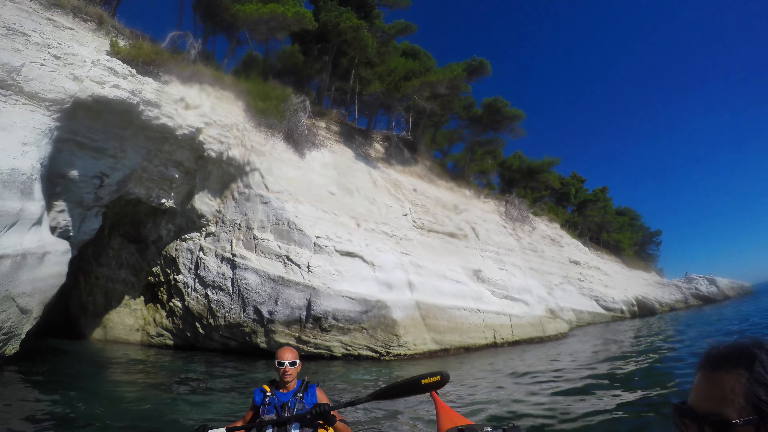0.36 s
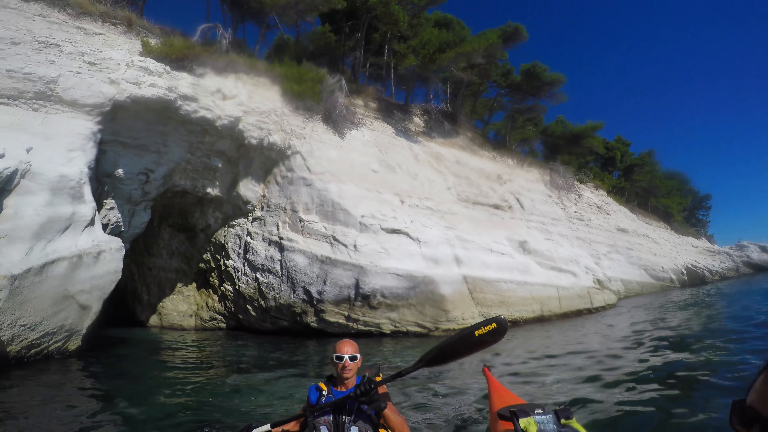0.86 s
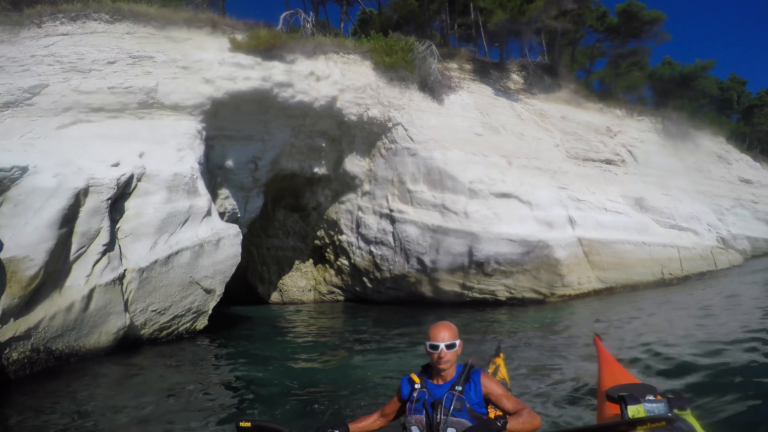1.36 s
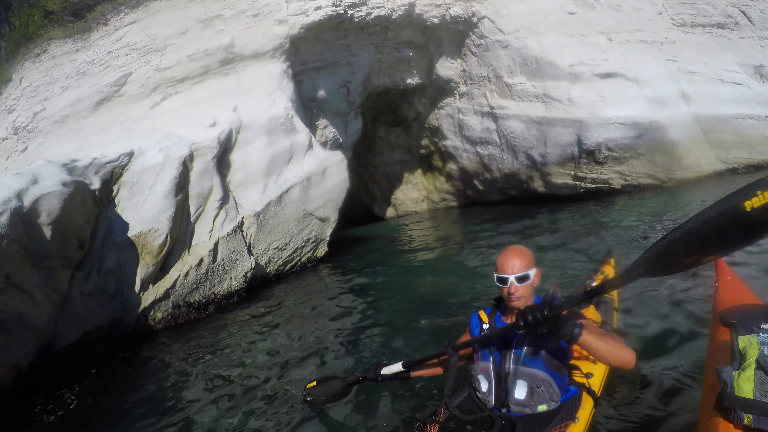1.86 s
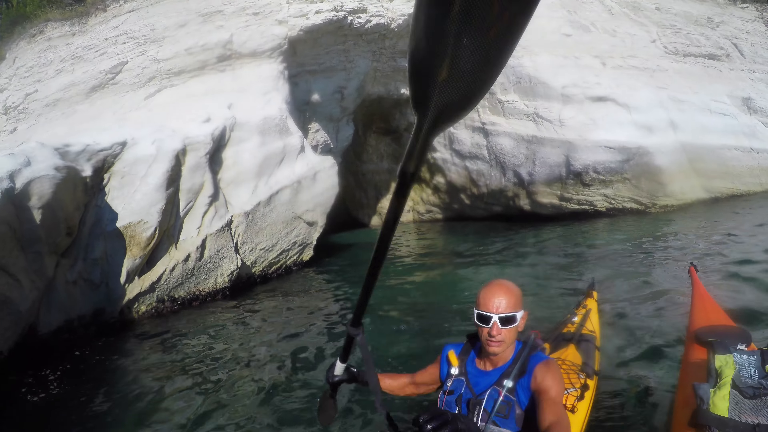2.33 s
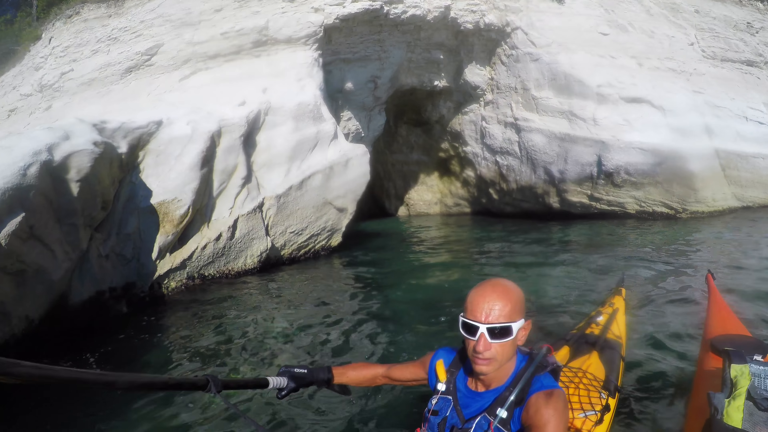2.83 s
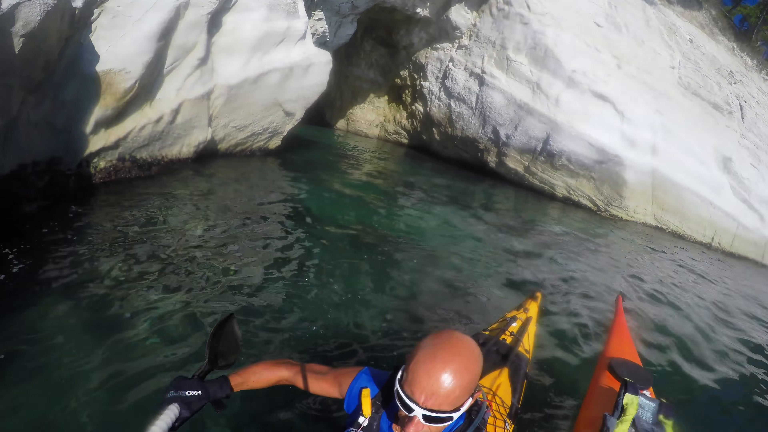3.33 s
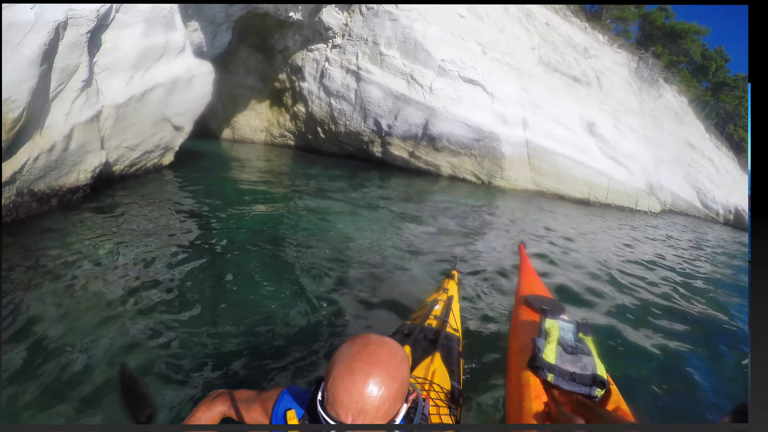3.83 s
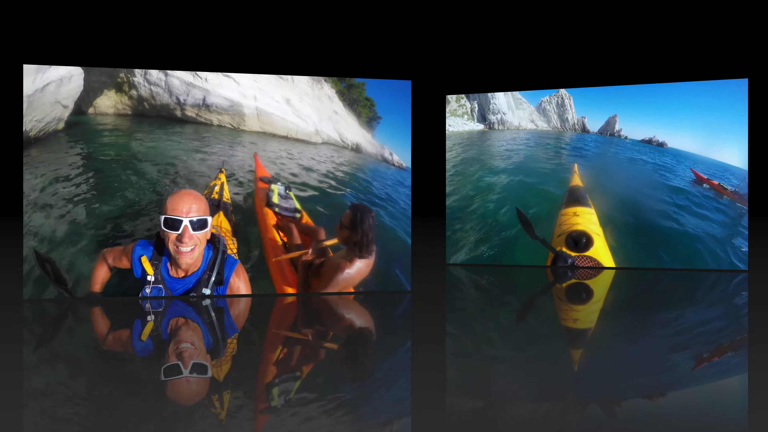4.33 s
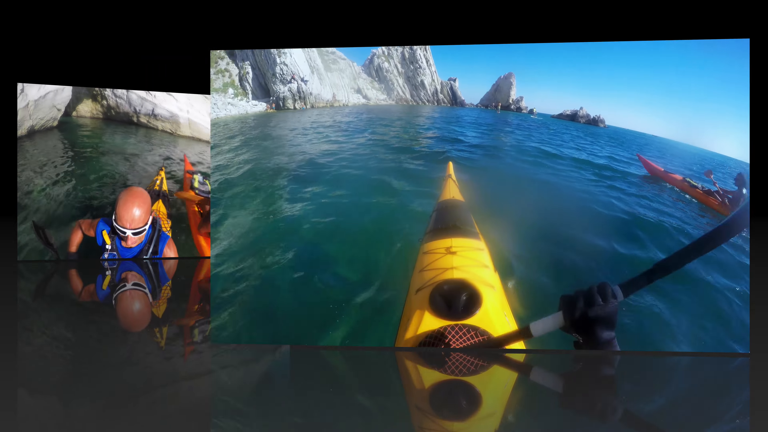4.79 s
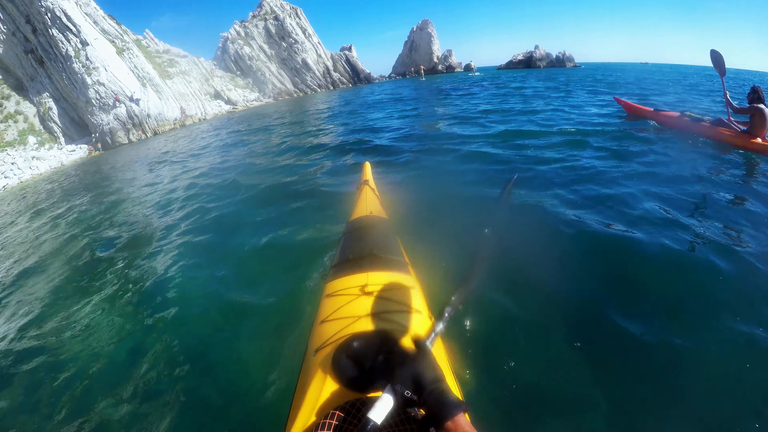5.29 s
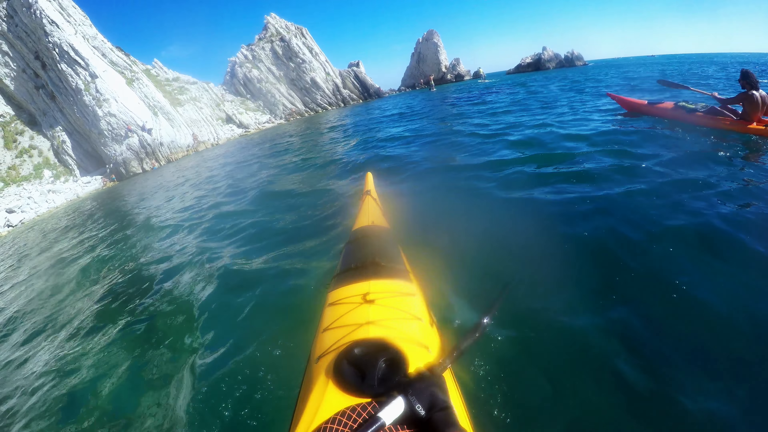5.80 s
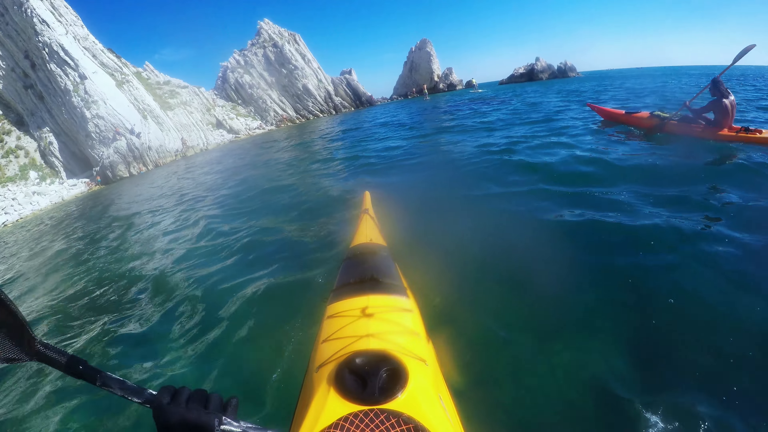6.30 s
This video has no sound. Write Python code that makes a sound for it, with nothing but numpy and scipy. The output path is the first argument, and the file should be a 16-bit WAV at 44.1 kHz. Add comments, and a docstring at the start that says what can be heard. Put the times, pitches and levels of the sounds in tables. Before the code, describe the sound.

Loud hollow knocks and thumps on a sealed case over low hull rumble and soft sea hiss, with rubbing fingers and faint bubbles.

```python
"""Kayak heard from inside a sealed case

Blows on the case ring its modes and thump its mount; rubbing fingers and cloth make bursts of noise grains.
Filtered-noise hull rumble and sea hiss lie beneath, with a pulsing cicada band, bubble drips of rising pitch
and a faint narrow tone. A cliff scene cross-fades to open water; the loudest knocks clip."""
import sys
import numpy as np
from scipy import signal
from scipy.fft import rfft, irfft, next_fast_len
from scipy.io import wavfile
from scipy.ndimage import uniform_filter1d, map_coordinates

SR = 44100
rng = np.random.default_rng(int(sys.argv[2]) if len(sys.argv) > 2 else 0)


def digitize_waveform(pressure):
    """Quantize a signal to 16-bit integers and store it at the path in sys.argv[1].

    Rows of a 2-D input are taken as channels; values are limited to [-1, 1].
    """
    field = np.atleast_2d(pressure).T
    bounded = np.clip(field, -1, 1)
    quanta = np.round(bounded * 32767).astype(np.int16)
    wavfile.write(sys.argv[1], SR, quanta)


def ratio(d):
    """dB to gain"""
    e = np.asarray(d, float) / 20
    return 10 ** e


N = 282573
TIME = np.arange(N) / SR


def unit(x):
    """Scales a signal to rms 1."""
    return x / np.sqrt(np.mean(x ** 2) + 1e-20)


def curve(rows):
    """Draws straight lines between (time_s, value) points, one value per sample."""
    time_s, value = np.transpose(rows)
    return np.interp(TIME, time_s, value)


def wobble(rate):
    """A smooth random curve with rate knots a second."""
    return map_coordinates(rng.standard_normal(int(N * rate / SR) + 4), [TIME * rate])


def filtered(x, response):
    """Multiplies the spectrum of x by a complex response of frequency."""
    m = next_fast_len(len(x) + 8192)
    return irfft(rfft(x, m) * response(np.fft.rfftfreq(m, 1 / SR)), m)[:len(x)]


def coloured(x, spectrum):
    """Shapes x by relative (frequency_hz, level_db) points on a log pitch axis, then scales to rms 1."""
    f, db = np.transpose(spectrum)
    return unit(filtered(x, lambda hz: ratio(np.interp(np.log(hz + 1), np.log(f + 1), db))))


def add(track, start_s, sound):
    """Mixes a sound into a track, cut off at the track's end."""
    part = track[round(start_s * SR):][:len(sound)]
    part += sound[:len(part)]


def open_share():
    """Share of the open-water scene, rising from 0 to 1 over the cross-fade."""
    return np.interp(TIME, [4, 5.05], [0, 1])


def both_scenes(source, cliff, open_water):
    """Colours a fresh draw of a noise source for each scene and cross-fades them at equal power."""
    share = open_share()
    near_cliff = np.sqrt(1 - share) * coloured(source(), cliff)
    on_open_water = np.sqrt(share) * coloured(source(), open_water)
    return near_cliff + on_open_water


def hull_rumble():
    """Lumpy low noise: the deep zone follows rocking, the hull zone handling; the upper swings harder with it."""
    # spectra of the three zones: frequency_hz, relative level_db per Hz
    deep_zone = [(8, -26.5), (15, 4.5), (40, 4.5), (60, -21), (120, -67), (300, -120)]
    hull_zone = [(30, -32.5), (55, -3), (76, 0.5), (95, -15.5), (110, -25.5), (300, -63.5), (800, -120)]
    upper_zone = [(90, -30), (120, -2), (150, -1.5), (190, -17.5), (400, -29.5), (600, -60), (900, -120)]
    # how hard the boat rocks: time_s, deep rumble level_db
    rocking = [(0, -27), (.6, -41.5), (1.053, -59.5), (1.3, -45.5), (1.69, -30.5), (2.28, -38.5),
               (2.7, -42.5), (3.28, -33.5), (3.55, -36.5), (3.9, -28.5), (4.44, -29.5), (4.6, -50),
               (5.2, -43), (6.05, -40), (6.41, -46)]
    # how hard the hull is handled and rocked: time_s, hull rumble level_db
    handling = [(0, -56), (.18, -36.5), (.32, -29), (.5, -40.5), (.68, -35), (.93, -55.5), (1.14, -56.5),
                (1.3, -40), (1.6, -38), (2.07, -39), (2.45, -45), (2.73, -35), (2.98, -30.5), (3.07, -37),
                (3.28, -27.5), (3.39, -39.5), (3.75, -39.5), (4.0, -28.5), (4.12, -32.5), (4.35, -29.5),
                (4.53, -40), (4.98, -50.5), (5.1, -33.5), (5.71, -44.5), (6.05, -28.5), (6.26, -42),
                (6.41, -41.5)]
    # upper zone: db over calm handling by the cliff, the same on open water, swing in db per db of handling
    upper_follows = (-17.5, -6, 1.3)
    calm_db = -40
    cliff_db, open_db, swing = upper_follows
    hull_db = curve(handling)
    over_calm_db = cliff_db + open_share() * (open_db - cliff_db)
    upper_db = calm_db + over_calm_db + swing * (hull_db - calm_db)
    lumps = ratio(4.4 * wobble(10))
    rumble = np.zeros(N)
    for level_db, zone in ((curve(rocking), deep_zone), (hull_db, hull_zone), (upper_db, upper_zone)):
        rumble += ratio(level_db) * unit(lumps * coloured(rng.standard_normal(N), zone))
    return rumble


def patchy(patchy_db):
    """Noise with patches of random gain in time and pitch, patchy_db rms."""
    z = signal.stft(rng.standard_normal(N + 512), nperseg=512)[2]
    field = uniform_filter1d(rng.standard_normal(z.shape), size=5, axis=0)  # across pitch
    field = uniform_filter1d(field, size=8, axis=1)  # across time
    return signal.istft(z * ratio(patchy_db * unit(field)), nperseg=512)[1][:N]


def droplets():
    """Sparse ticks of spray: single-sample impulses of random strength, about 40 a second."""
    return (rng.random(N) < 40 / SR) * rng.standard_normal(N) * 5.5


def sea_hiss():
    """The hiss of the sea: patchy noise with ticks of spray, coloured by the scene."""
    # hiss spectrum in each scene: frequency_hz, relative level_db per Hz
    sea_cliff = [(150, -28), (250, -1), (386, -6), (501, -3.5), (1450, -10), (1760, -1.5), (2620, -4),
                 (3770, -11), (4490, -5.5), (4900, -9), (5440, -8.5), (7980, -19.5), (13700, -24),
                 (15200, -23), (16000, -47)]
    sea_open = [(150, -28.5), (250, -6.5), (346, -2.5), (687, -3.5), (951, -6), (1650, -9.5), (2160, -12),
                (2570, 1), (3000, -12.5), (4760, -14.5), (7820, -23), (10100, -26), (15000, -28),
                (15800, -54.5)]
    # the hiss drops after the first big knock and creeps back: time_s, level_db
    sea_level = [(0, -62.5), (.32, -57.5), (.6, -63.5), (.66, -71), (.93, -68.5), (1.02, -74), (1.87, -57),
                 (2.28, -59), (3.0, -61), (3.8, -58), (4.5, -62.5), (5.2, -58), (6.41, -55)]
    hiss = both_scenes(lambda: patchy(patchy_db=1.4) + droplets(), sea_cliff, sea_open)
    return ratio(curve(sea_level)) * hiss


def cicadas():
    """Distant insects: a narrow noise band that swells 4.6 times a second and goes with the cliff scene."""
    # time_s, level_db ahead of the swell and the scene fade
    cicada_level = [(0, -61), (.61, -67.5), (.65, -89), (.95, -97), (1.02, -75), (2, -59.5), (3, -65),
                    (4.2, -64)]
    rasp_band = [(3900, -50.5), (4250, -6.5), (4620, 2.0), (4850, -9.5), (5100, -64.5)]  # Hz, relative dB
    song = coloured(rng.standard_normal(N), rasp_band)
    swell = np.clip(0.68 + np.sin(2 * np.pi * 4.6 * (TIME - .01)), .4, 1)
    return ratio(curve(cicada_level)) * (1 - open_share()) ** 2 * swell * song


def knocks():
    """A blow and a short chatter ring the case; where and how softly it lands sets which modes lead."""
    # blows: start_s, peak_db, lead_hz (strongest pitch), fall above it in db per octave, contact_ms
    blows = [(0.226, -45.5, 654, 20, 4.3), (0.334, -37, 1860, -4, 9), (0.387, -44, 254, 16, 7.5),
             (0.622, 12, 700, 5.5, 3), (0.6235, 7.5, 1670, 8.5, 2.7), (0.636, -34.5, 1798, 13, 9.3),
             (1.601, -46, 2490, -1, 8), (1.738, -41, 470, 1.5, 10), (1.799, -42.5, 2520, -2.5, 6.6),
             (1.823, -36.5, 2440, -4.5, 7), (1.942, -41.5, 2340, 0.5, 8), (1.979, -42, 4400, 5, 4),
             (2.368, -42, 2650, 3.5, 6.3), (2.925, -14.5, 490, -0.5, 7.2), (2.929, -24, 700, -0.5, 2.7),
             (2.94, -24.5, 1700, -1, 3.7), (2.956, -12, 980, -3, 2.6), (3.12, -43, 4000, 13, 3),
             (3.138, -31.5, 1230, 3, 2.25), (3.15, -31, 1660, 3.5, 2.1), (3.168, -24, 810, 6.5, 2),
             (3.183, -28, 2020, -3, 2), (3.19, -21, 1700, -2, 1.6), (3.203, -16, 830, -3, 1.8),
             (3.278, -28, 1000, 3, 2), (3.561, -44, 500, 11, 4), (3.801, -41, 2600, 1, 3.9),
             (3.837, -43.5, 6100, 14, 7), (3.862, -40, 6100, 11, 7), (3.837, -33, 677, 13, 3.6),
             (3.858, -48, 1010, 13, 3), (3.872, -37, 1600, 8, 2.7), (4.169, -24.5, 700, 3, 6),
             (4.209, -38, 1890, -2, 4), (4.334, -40.5, 437, 16.5, 3.6), (4.384, -43.5, 503, 10, 7.2),
             (4.435, 5, 676, 5.5, 2.53), (4.477, -34, 900, 4.5, 6.9), (4.764, -34, 438, 9.5, 11),
             (4.877, -41.5, 3616, -6, 2.8), (5.067, -24.5, 662, 3.5, 6.5), (5.181, 9, 2570, 15, 2.66),
             (5.214, -20.5, 1050, 1.5, 3.5), (5.313, -27.5, 515, 11.5, 3.5), (5.616, 0.5, 1050, 1.5, 1.87),
             (5.847, -17.5, 2460, 32, 3.2), (5.974, -18.5, 2440, 24.5, 4.1), (6.01, -34, 1700, 1, 16),
             (6.034, -13.5, 2660, 3.5, 9.1), (6.125, -33, 2463, -2, 2.6), (6.131, -19.5, 570, 8.5, 4.8),
             (6.144, -18.5, 1090, 0, 10.6), (6.3, -46.5, 450, 15.5, 8.2)]
    # ringing modes of the case: pitch_hz, width_hz, level_db, ahead of the spread from blow to blow
    case_modes = [(437, 140, -1.5), (700, 120, -1), (1050, 180, 1), (1685, 95, 2), (2030, 180, -6),
                  (2672, 310, -1), (2950, 200, -7.5), (3920, 190, -9.5), (4450, 370, -15.5),
                  (5640, 290, -22.5), (6100, 580, -23.5), (6600, 330, -29), (7500, 500, -30),
                  (9200, 450, -35), (12100, 730, -32), (14800, 900, -40.5)]
    grip_shift, grip_db = .02, 2  # spread of each mode from blow to blow: share of pitch, dB
    below_lead_db = 5.5  # fall per octave under the lead pitch, ahead of the loss for light taps
    light_db, hard_db = 0.4, -23  # extra fall per octave for each dB a tap peaks under hard_db
    chatter_ratio = 5.8  # chatter t60 over contact time
    out, t = np.zeros(N), TIME[:SR // 10]
    grips = rng.standard_normal((len(blows), len(case_modes), 2))
    for (start_s, peak_db, lead_hz, above_db, contact_ms), grip in zip(blows, grips):
        modes = [(hz * (1 + grip_shift * shift), width, db + grip_db * gain)
                 for (hz, width, db), (shift, gain) in zip(case_modes, grip)]
        below_db = below_lead_db + light_db * max(hard_db - peak_db, 0)

        def case(f):
            """Sum of resonances with alternating sign."""
            return sum((-1) ** k * ratio(db) * 1j * f * width / (hz * hz - f * f + 1j * f * width)
                       for k, (hz, width, db) in enumerate(modes))

        def contact(f):
            """Slopes on either side of the lead pitch."""
            low_side = (1 + lead_hz / (1j * f + 1)) ** (-below_db / 6)
            high_side = (1 + 1j * f / lead_hz) ** (-above_db / 6)
            return low_side * high_side

        def nearest(f):
            """Extra resonance at the lead pitch: the mode under the blow rings most."""
            return 1 + 2.7 * 1j * f / (2.9 * (lead_hz - f * f / lead_hz) + 1j * f)

        t60 = chatter_ratio * max(contact_ms, .5) / 1000
        chatter = rng.standard_normal(len(t)) * ratio(-60 * t / t60) * (1 - np.exp(-t / 0.0003))
        chatter[30] -= 11.5  # the first blow
        ring = filtered(chatter, lambda f: case(f) * contact(f) * nearest(f))
        add(out, start_s, ratio(peak_db) * ring / np.abs(ring).max())
    return out


def tones():
    """A faint narrow noise band at one pitch of the case swells and fades."""
    # start_s, length_s, level_db at the middle
    tone_swells = [(0.261, .13, -58.5), (5.718, 0.32, -59.5)]
    # frequency_hz, relative level_db per Hz
    tone_band = [(1600, -50), (1700, -6), (1740, 5), (1780, -15), (1880, -59)]
    swell = np.zeros(N)
    for start_s, length_s, level_db in tone_swells:
        progress = np.clip((TIME - start_s) / length_s, 0, 1)
        swell += ratio(level_db) * np.sin(np.pi * progress) ** .5
    return swell * coloured(rng.standard_normal(N), tone_band)


def drips():
    """A bubble is a short sine whose pitch climbs as it nears the surface."""
    # start_s, level_db ahead of fall and flutter, start pitch_hz, rise in octaves, length_s
    bubbles = [(0.405, -52, 1740, .02, 0.019), (0.488, -58, 1050, 0.24, 0.035),
               (2.38, -52.5, 1270, 0.021, 0.015), (2.486, -47.5, 1173, 0.22, 0.015),
               (2.598, -44.5, 1050, 1.5, 0.058), (3.033, -57, 1180, .9, 0.025),
               (3.832, -43, 583, 0.16, 0.025), (3.857, -39, 960, .1, 0.0082),
               (5.665, -45.5, 2290, 0.37, 0.018)]
    out = np.zeros(N)
    for start_s, level_db, hz, rise, length_s in bubbles:
        progress = TIME[:round(length_s * SR)] / length_s
        phase = 2 * np.pi * np.cumsum(hz * 2 ** (rise * progress ** 1.7)) / SR
        flutter_db = 5.4 * np.interp(progress * 6, range(8), rng.standard_normal(8))
        level = ratio(level_db - 13.0 * progress + flutter_db)
        ends = np.clip(progress * 14, 0, 1) * np.clip(6 - 6 * progress, 0, 1)  # fade in and out
        add(out, start_s, level * ends * np.sin(phase))
    return out


def grit():
    """Friction grains: noise of uneven level with sparse sharp slips on top."""
    slips = (rng.random(N) < 500 / SR) * rng.standard_normal(N) * 4
    uneven_db = 2 * wobble(300) + 2.8 * wobble(70)
    return rng.standard_normal(N) * ratio(uneven_db) + slips


def rubs():
    """Cloth and wet fingers slide on the case: dense uneven grains, some strokes brighter."""
    # grain spectrum in each scene: frequency_hz, relative level_db per Hz
    rub_cliff = [(120, -27.5), (200, -1), (360, -7.5), (440, -1.5), (683, -4.5), (899, -0.5), (1400, -8.5),
                 (2020, -3.5), (2860, -16.5), (3400, -30.5), (4050, -14), (5000, -30.5), (5970, -27.5),
                 (7420, -40), (9150, -36.5), (9960, -39.5), (11700, -30.5), (13500, -43), (15000, -35.5),
                 (16000, -63)]
    rub_open = [(120, -33), (200, -2), (289, -10), (659, 1.5), (899, -5), (1120, 1), (1480, -10.5),
                (2510, -2.5), (3370, -20), (4350, -12.5), (5040, -34.5), (7010, -25.5), (8270, -42),
                (14900, -46), (16000, -67)]
    # strokes: start_s, hardest_s, end_s, level_db at the hardest, gain in db of the treble above 3.4 kHz
    strokes = [(.545, 0.586, 0.61, -52, -15.5), (2.636, 2.71, 2.86, -52.5, -6),
               (2.925, 2.93, 2.937, -29, 8), (2.946, 2.958, 2.995, -28, 0), (2.964, 2.989, 3.08, -44, -8),
               (3.1, 3.14, 3.19, -42, -2.5), (3.19, 3.201, 3.3, -39.5, -6), (3.225, 3.298, 3.335, -35, -1),
               (3.29, 3.344, 3.352, -46, 11), (4, 4.025, 4.1, -48, -15), (4.084, 4.128, 4.158, -46, -7.5),
               (4.19, 4.215, 4.3, -38, -4.5), (4.22, 4.29, 4.335, -42, -5), (4.437, 4.444, 4.475, -34, -10),
               (5.087, 5.169, 5.18, -51.5, -15.5), (5.18, 5.187, 5.28, -38, -3),
               (5.359, 5.397, 5.453, -43.5, -18.5), (5.487, 5.545, 5.552, -47, -19),
               (5.615, 5.618, 5.72, -48, -5), (5.854, 5.937, 5.985, -45.5, -7.5),
               (6.005, 6.015, 6.03, -45, -5), (6.029, 6.04, 6.075, -31, 5), (6.095, 6.127, 6.131, -39, 6.5),
               (6.137, 6.148, 6.175, -27.5, 2.5), (6.15, 6.178, 6.19, -35, 7)]
    touch_db, leave_db = -17, -14  # start and end of a stroke under its hardest
    lift_s = .006  # decay constant once the finger lifts
    out = np.zeros(N)
    grains = both_scenes(grit, rub_cliff, rub_open)
    treble = filtered(grains, lambda hz: 1 / (1 + (3400 / (hz + 1)) ** 8))
    for start_s, hardest_s, end_s, level_db, treble_db in strokes:
        onset = uniform_filter1d(TIME > start_s, size=150, output=float)
        lift = np.exp(-np.maximum(TIME - end_s, 0) / lift_s)
        pressure_db = np.interp(TIME, [start_s, hardest_s, end_s], [touch_db, 0, leave_db])
        brightened = grains + (ratio(treble_db) - 1) * treble
        out += onset * lift * ratio(level_db + pressure_db) * brightened
    return out


def thumps():
    """The mount swings after each push, fast at first and then slower; its 75 Hz sway lingers."""
    # start_s, level_db ahead of onset and decay, settled pitch_hz, t60_s, push direction
    pushes = [(0.588, -21.5, 139, 0.064, -1), (0.627, 16, 58.4, 0.043, 1), (2.935, 9, 52, 0.085, -1),
              (2.958, 1, 67, 0.042, -1), (2.98, -9, 34, 0.13, 1), (3.203, -8.5, 103, .036, 1),
              (3.29, -15.5, 87, 0.18, -1), (3.306, -9, 86.3, 0.12, -1), (4.024, -8.5, 53.5, 0.14, -1),
              (4.173, -11.5, 74, 0.052, -1), (4.226, -11, 61.4, 0.034, -1), (4.44, 3.5, 32, .11, 1),
              (4.767, -16.5, 72.6, 0.041, -1), (5.068, -22.5, 70, 0.049, -1), (5.188, 3.5, 41, 0.094, -1),
              (5.255, -10, 36.8, 0.16, -1), (5.618, 12, 56.2, 0.022, -1), (5.628, 6.5, 43.5, 0.028, 1),
              (5.669, -11, 45.6, 0.15, -1), (5.692, -17.5, 29.3, 0.088, 1), (5.85, 0.5, 51.8, 0.024, -1),
              (5.86, -10, 48, 0.078, 1), (5.976, -7, 52, 0.096, -1), (6.037, -9.5, 44.5, 0.16, -1),
              (6.136, -11, 53.7, 0.16, -1)]
    out, t = np.zeros(N), TIME[:SR // 2]
    for start_s, level_db, hz, t60, push in pushes:
        turns = np.cumsum(hz + 75 * np.exp(-t / 0.0058)) / SR  # starts 75 Hz above its settled pitch
        swing = np.sin(2 * np.pi * turns) * ratio(-60 * t / t60)
        sway = ratio(-32.5 - 60 * t / 0.4) * np.sin(2 * np.pi * 75 * t)
        onset = 1 - np.exp(-t / 0.0038)
        add(out, start_s, np.sign(push) * ratio(level_db) * onset * (swing + sway))
    return out


def scene():
    """All sources summed at one microphone."""
    background = hull_rumble() + sea_hiss() + cicadas()
    return (background + knocks() + tones() + drips() + rubs() + thumps())[None]


def low_pass(x):
    """Removes everything above the highest recorded frequency."""
    return signal.sosfilt(signal.butter(12, 16510, fs=SR, output="sos"), x)


def record(dry):
    """The input clips with a rounded knee; its ceiling dips to half midway through the cross-fade."""
    ceiling = .97 * np.maximum(open_share(), 1 - open_share())
    clipped = dry / (1 + np.abs(dry / ceiling) ** 8) ** (1 / 8)
    return low_pass(clipped)


dry = scene()
out = record(dry)
digitize_waveform(out)
```